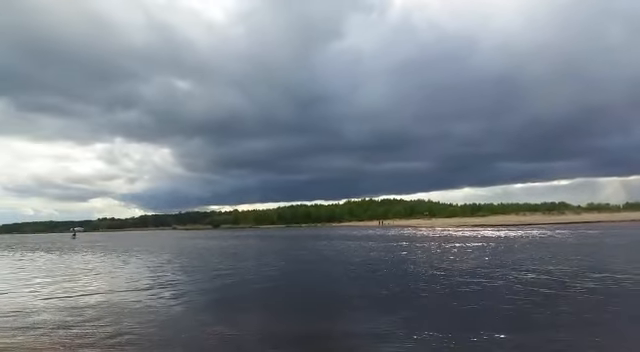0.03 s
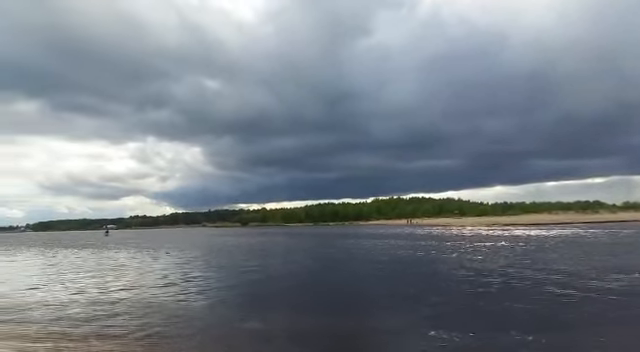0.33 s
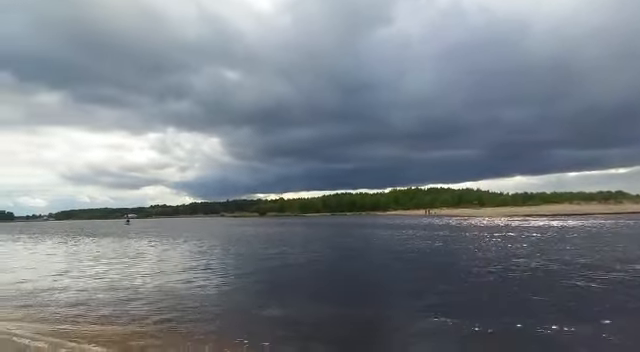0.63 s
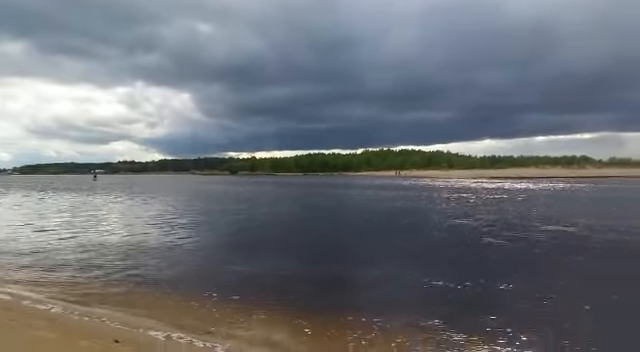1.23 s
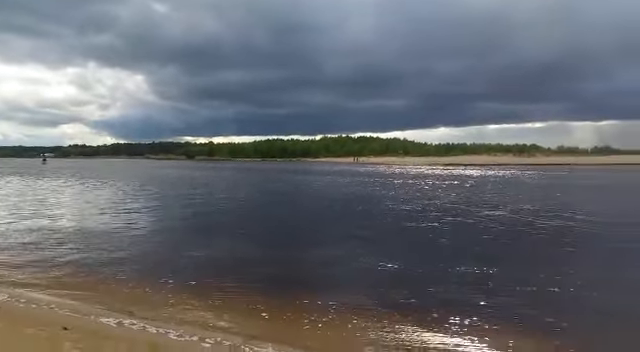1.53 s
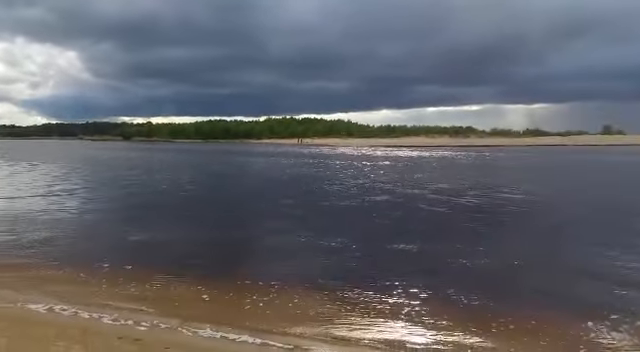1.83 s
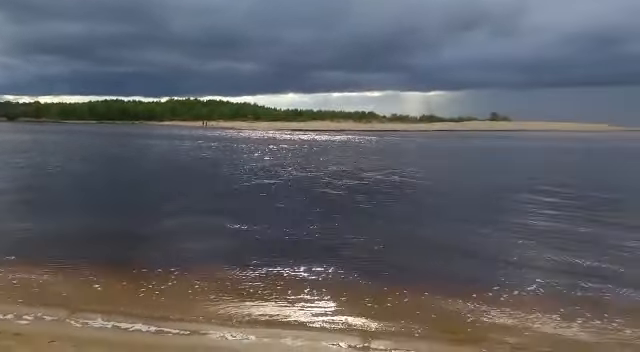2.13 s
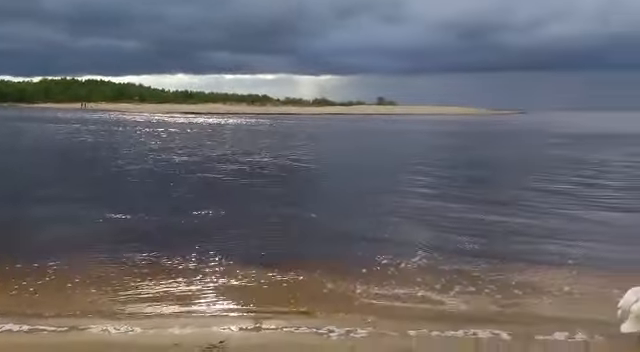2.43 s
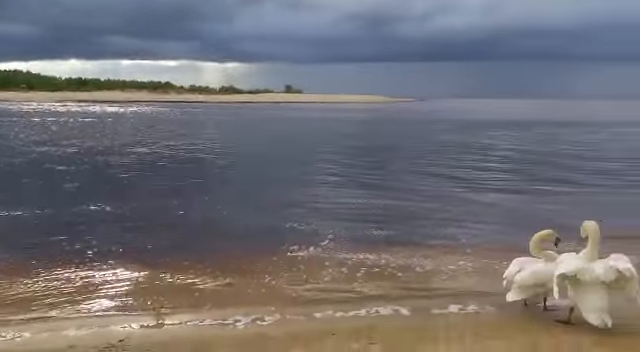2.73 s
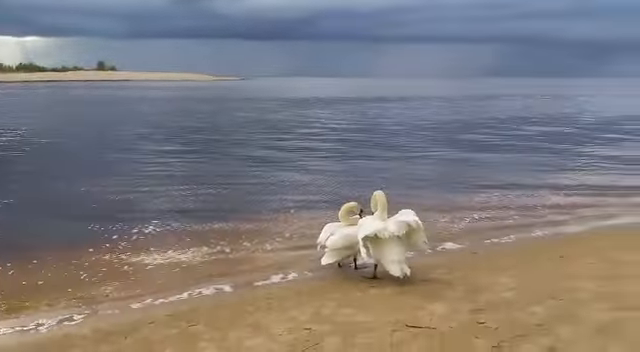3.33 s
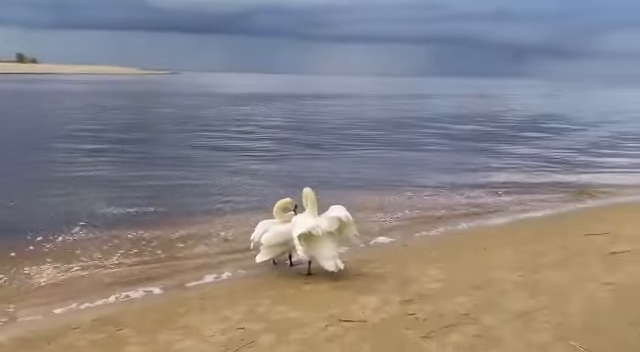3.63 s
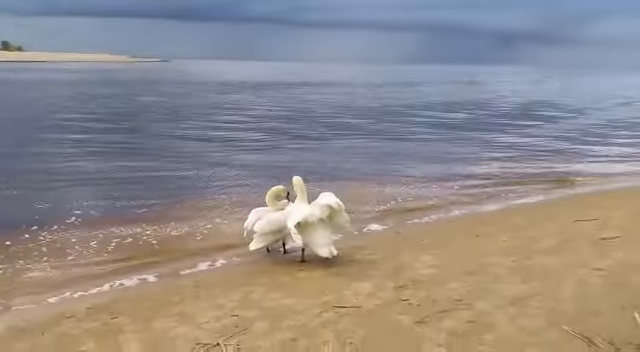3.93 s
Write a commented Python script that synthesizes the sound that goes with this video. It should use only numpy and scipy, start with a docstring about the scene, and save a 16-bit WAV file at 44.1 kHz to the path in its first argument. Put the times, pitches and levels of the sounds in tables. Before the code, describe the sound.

A swan gives a short snort and a long rattling grunt, with wind and lapping water.

```python
"""A swan on a sandy shore gives a short snort, then one long rattling grunt. Its voice is a
source and a filter: slow flaps release bursts of air that ring the resonances of its long throat.
Turbulent wind buffets the two microphone ports separately and drops after three seconds.
Small waves wash and fizz throughout, with ringing bubbles and, near the end, two clear drips."""
import sys
import numpy as np
from scipy import signal
from scipy.fft import rfft, irfft, next_fast_len
from scipy.io import wavfile
from scipy.ndimage import uniform_filter1d, minimum_filter1d, map_coordinates

SR = 44100
rng = np.random.default_rng(int(sys.argv[2]) if len(sys.argv) > 2 else 0)


def store_wav(level_fs):
    """Save 16-bit WAV to argv[1]."""
    pcm = np.round(np.clip(np.atleast_2d(level_fs), -1, 1) * 32767)
    wavfile.write(sys.argv[1], SR, pcm.T.astype(np.int16))


N = 176400

# Effort of each call. Each row: time in seconds, relative level in dB, treble gain in dB.
SNORT_EFFORT = [(.401, -40.5, -9), (.436, -31, -10.5), (0.493, -46.5, -11)]
GRUNT_EFFORT = [(2.06, -32.5, -17.5), (2.103, -29, -16.5), (2.219, -31.5, -15), (2.318, -23, -15),
                (2.5, -34, -11.5), (2.758, -34.5, -12.5), (2.95, -36, -10), (3.34, -38.5, -22.5),
                (3.39, -45, -10), (3.669, -45, -3.5)]
# Pace of each call. Each row: start in seconds, flaps per second. The last row ends the call.
SNORT_PACE = [(.401, 30), (.434, 52), (.51, 52)]
GRUNT_PACE = [(2.058, 22), (2.104, 26), (2.142, 41), (2.262, 50), (2.522, 43), (2.592, 53), (2.722, 45),
              (2.901, 40.5), (3.148, 36.5), (3.339, 29), (3.68, 29)]
# Shape of the throat. Each row: time in seconds, then six resonance frequencies in Hz.
THROAT_HZ = [(.44, 760, 1900, 2400, 4300, 4850, 5300), (2.25, 660, 2050, 2460, 4250, 4650, 5400),
             (2.7, 843, 1750, 2540, 4500, 4850, 6150), (3.0, 917, 1750, 2300, 4650, 4850, 6300),
             (3.25, 900, 1950, 2450, 4650, 4950, 5800), (3.6, 814, 1900, 2400, 4350, 4600, 4950)]
# The six resonances. Each row: bandwidth of each of two cascaded stages in Hz, gain in dB.
FORMANTS = [(323, 10), (389, 7), (231, 5), (413, 3.5), (332, 8), (356, 0.5)]
# Treble shelf of the voice. Each row: frequency in Hz, share of the treble gain from 0 to 1.
TREBLE_SHELF = [(2500, 0), (4500, 1)]
# The left port lags less as the microphone turns to the bird. Each row: time and lag in seconds.
LEFT_LAG = [(2.9, .00035), (3.3, .0001)]

# Airflow at each port. Each row: time in seconds, relative rumble level in dB.
FLOW_LEFT = [(0, -22), (.35, -35), (.4, -18.5), (.73, -32), (1.0, -25), (1.6, -25.5), (2.1, -13.5),
             (2.5, -25), (2.9, -24), (3.2, -42), (3.45, -33), (4, -36.5)]
FLOW_RIGHT = [(0, -40.5), (.66, -35.5), (.72, -27), (1.48, -19), (1.58, -28.5), (1.95, -22.5), (2.22, -29),
              (2.4, -15.5), (2.88, -15.5), (2.93, -32.5), (4, -37.5)]
# Single eddies. Each row: middle and length in seconds, relative rumble and flutter in dB, port hit.
EDDIES = [(.091, .018, -6.5, -19, "left"), (0.151, .065, -13, -28.5, "left"),
          (0.28, 0.021, -12, -33, "left"), (0.398, 0.018, -15.5, -26.5, "left"),
          (0.528, 0.025, -13, -32.5, "left"), (0.686, 0.017, -18.5, -36.5, "right"),
          (0.813, 0.03, -15, -25.5, "left"), (1.019, 0.017, -10.5, -23.5, "right"),
          (1.043, 0.015, -6.5, -35, "left"), (1.271, 0.011, -6, -37, "right"),
          (1.368, 0.0097, -12, -19, "right"), (1.488, 0.013, -10.5, -15, "right"),
          (1.539, 0.018, -16.5, -15.5, "left"), (1.66, 0.034, -10, -28.5, "left"),
          (1.749, 0.061, -11.5, -25.5, "left"), (1.838, 0.023, -10, -18.5, "right"),
          (1.866, 0.019, -12.5, -9.5, "right"), (1.997, 0.021, -16.5, -16, "left"),
          (2.076, 0.09, -16, -23, "right"), (2.152, 0.011, -11, -31, "left"),
          (2.288, 0.036, -12, -15.5, "right"), (2.371, 0.014, -8.5, -2.5, "right"),
          (2.419, 0.052, -37, -14, "right"), (2.474, 0.008, -24.5, -4.5, "right"),
          (2.581, 0.16, -18.5, -14.5, "right"), (2.775, 0.016, -23, -11.5, "right"),
          (2.832, 0.013, -32.5, -14.5, "right"), (2.872, 0.011, -13, -13.5, "right"),
          (3.357, 0.017, -28, -26.5, "left")]
# Spectra of the three wind noises. Each row: frequency in Hz, relative level in dB.
RUMBLE_SPECTRUM = [(20, -12), (45, -6.5), (70, 3.5), (170, 2), (320, -13), (480, -19.5), (2000, -100)]
FLUTTER_SPECTRUM = [(120, -12.5), (260, 4), (430, -2), (750, -13.5), (1300, -38), (5000, -95.5)]
CRACKLE_SPECTRUM = [(300, -10.5), (650, 12), (1200, 1), (1750, -11), (3000, -33.5), (8000, -70.5)]

# Lapping waves. Each row: time in seconds, wash in dB, fizz in dB, fizz left minus right in dB.
WAVES = [(.1, -57.5, -59.5, -7), (.2, -51.5, -50, -4.5), (.7, -54.5, -57, -2), (1.72, -53, -51, -2),
         (2.8, -50.5, -56, -7.5), (3.35, -59.5, -63.5, -3.5), (3.45, -51.5, -63, -15.5),
         (3.8, -51, -56, -4), (3.98, -43.5, -48, -4.5)]
# Spectra of the two water noises. Each row: frequency in Hz, relative level in dB.
WASH_SPECTRUM = [(150, -6.5), (800, -2.5), (1300, -12), (2000, -7.5), (2500, -12.5), (3100, -21),
                 (4000, -18), (7000, -55.5)]
FIZZ_SPECTRUM = [(2500, -23.5), (3600, -22.5), (4700, 3), (6200, -5.5), (7000, -11), (15000, -3.5)]
# Clear drips. Each row: start in seconds, pitch in Hz, level in dB, left minus right in dB.
DRIPS = [(3.427, 4560, -41.5, -16), (3.518, 4500, -41, -15)]
# Frequency response of the microphone. Each row: frequency in Hz, gain in dB.
MIC_RESPONSE = [(6200, 1.5), (7300, -12.5), (8200, -26.5), (11000, -26.5), (12500, -19.5), (15800, -25)]


def swan_call(pace, effort, leak_db):
    """Source and filter: each flap sends a noise burst, then a weak leak, through the throat."""
    attack_s, decay_s, leak_decay_s, jitter_s = .0012, .0034, .015, .0012
    boost_db, scatter_db, diffuse_db, treble_lean_db = 4, 1.8, -12, -10
    out, size = np.zeros((2, N)), 4096
    t, hz = np.arange(size) / SR, np.fft.rfftfreq(size, 1 / SR)
    starts = np.concatenate([np.linspace(start, end, round((end - start) * rate), endpoint=False)
                             for (start, rate), (end, _) in zip(pace, pace[1:])])
    usual_db = np.mean(effort, axis=0)[1]
    shelf = along(TREBLE_SHELF, hz)
    for start in starts:
        air = rng.standard_normal((2, size))
        stray_db, stray_s = rng.normal(0, [scatter_db, jitter_s])
        level_db, treble_db = curves(effort, start)
        # More air leaks between flaps as the bird pushes harder.
        leak = amp(leak_db + .35 * (level_db - usual_db)) * np.exp(-t / leak_decay_s)
        burst = (1 - np.exp(-t / attack_s)) ** 2 * (np.exp(-t / decay_s) + leak)
        direct, diffuse = rfft(air * burst) * throat(start, hz) * amp(treble_db * shelf)
        diffuse *= amp(diffuse_db)
        # The right port hears the flap first and brighter.
        lag = np.exp(-2j * np.pi * hz * curves(LEFT_LAG, start)[0])
        flap = irfft(panned(treble_lean_db * shelf) * [(direct + diffuse) * lag, direct - diffuse])
        flap *= np.sqrt(2 * SR * decay_s / np.sum(flap ** 2))  # equal energy before the gain
        add(out, start + stray_s, amp(boost_db + level_db + stray_db) * flap)
    return out


def throat(time_s, hz, scatter=.014):
    """Resonance of an air column: six parallel formants, slightly detuned at every flap."""
    centres = np.array(curves(THROAT_HZ, time_s)) * rng.normal(1, scatter, len(FORMANTS))
    return sum(amp(db) * (1j * hz * width / (centre ** 2 - hz ** 2 + 1j * hz * width)) ** 2
               for centre, (width, db) in zip(centres, FORMANTS))


def wind():
    """Turbulent pressure: each port rumbles, eddies add flutter, and the strongest flow crackles."""
    t = np.arange(N) / SR
    flow_db = np.array(curves(FLOW_LEFT, t) + curves(FLOW_RIGHT, t)) + 4 * wobble(per_s=27.723)
    rumble, flutter = amp(flow_db), amp(1.6 * flow_db - 2)  # flutter grows faster than rumble
    for middle, length, rumble_db, flutter_db, side in EDDIES:
        port = int(side == "right")
        swell = 1 / np.hypot(1, (2 * (t - middle) / length) ** 4)
        rumble[port] = np.maximum(rumble[port], amp(rumble_db) * swell)
        flutter[port] = np.maximum(flutter[port], amp(flutter_db) * swell)
    rumble *= amp(-.5)
    flutter *= amp(3.5 * wobble(per_s=110) - 1)
    return crackle(flutter) + rumble * churn(RUMBLE_SPECTRUM) + flutter * churn(FLUTTER_SPECTRUM)


def crackle(flutter, knee_db=-12.5, level_at_knee_db=-24.5, swing_db=13.5):
    """Intermittency: strong wind tears into spurts that grow about as the flutter squared, to a cap."""
    strength = amp(level_at_knee_db) * np.minimum(flutter / amp(knee_db), 2) ** 1.95
    spurts = rng.standard_normal((2, N)) * amp(swing_db * np.minimum(wobble(per_s=400), 1))
    return strength * coloured(spurts, CRACKLE_SPECTRUM)


def churn(spectrum, evenness=.55):
    """Local turbulence: noise of fairly even strength, uncorrelated between the two ports."""
    noise = coloured(rng.standard_normal((2, N)), spectrum)
    even = noise / np.abs(signal.hilbert(noise)) ** evenness
    # Flattening the envelope spreads the spectrum, so its skirts are trimmed.
    return unit(filtered(even, lambda hz: np.minimum(amp(along(spectrum, hz) + 14.5), 1)))


def water():
    """Broadband noise and bubble resonance: waves wash, fizz and foam on the sand, and drips ring."""
    wash_db, fizz_db, lean_db = curves(WAVES, np.arange(N) / SR)
    out = amp(wash_db) * rush(WASH_SPECTRUM) + amp(fizz_db) * panned(lean_db) * rush(FIZZ_SPECTRUM)
    for start, hz, db, side_db in DRIPS:
        add(out, start, amp(db) * panned(side_db) * bubble(hz, decay_cycles=17.7))
    return out + amp(wash_db - 15) * foam()


def rush(spectrum, patch_db=3.5):
    """Random modulation: water noise swells and fades in patches of time and frequency."""
    cells = signal.stft(rng.standard_normal((2, N)), nperseg=256)[2]
    patches = uniform_filter1d(rng.standard_normal(cells.shape), size=4, axis=1)
    patches = uniform_filter1d(patches, size=9, axis=2)
    mid, side = signal.istft(cells * amp(patch_db * unit(patches)), nperseg=256)[1][:, :N]
    return coloured(np.array([mid + side, mid - side]), spectrum)


def foam(bubbles_per_s=50, median_hz=2030, highest_hz=6000):
    """Superposition: bubbles of random pitch, level and side ring at random times."""
    out = np.zeros((2, N))
    for start in rng.uniform(0, N / SR, int(bubbles_per_s * N / SR)):
        hz = min(median_hz * rng.lognormal(sigma=.5), highest_hz)
        db, side_db = rng.normal(0, [3.3, 5])
        add(out, start, amp(db) * panned(side_db) * bubble(hz, decay_cycles=5.5))
    return unit(out)


def bubble(hz, decay_cycles):
    """A damped oscillator: a bubble rings down while its pitch rises a little."""
    age = np.arange(SR // 25) / SR * hz / decay_cycles  # in decay times
    ring = np.sin(2 * np.pi * decay_cycles * age * (1 + .01 * age))
    return ring * np.exp(-age) * (1 - np.exp(-6 * age))


def amp(db):
    """Amplitude ratio of a level in dB."""
    return 10 ** (np.asarray(db) / 20)


def unit(x):
    """Normalisation to an rms of 1."""
    return x / np.sqrt(np.mean(x ** 2) + 1e-20)


def along(points, hz):
    """Interpolation on a logarithmic frequency axis."""
    knots_hz, values = np.transpose(points)
    return np.interp(np.log(hz + 1), np.log(knots_hz + 1), values)


def curves(rows, at):
    """Linear interpolation in time of each column after the first."""
    times, *columns = np.transpose(rows)
    return [np.interp(at, times, column) for column in columns]


def wobble(per_s):
    """Spline interpolation of random knots: one smooth curve for each channel."""
    at = np.arange(N) * per_s / SR
    return np.array([map_coordinates(knots, [at]) for knots in rng.standard_normal((2, 4096))])


def filtered(x, response):
    """Filtering as multiplication in the frequency domain."""
    size = next_fast_len(N + SR // 4)
    return irfft(rfft(x, size) * response(np.fft.rfftfreq(size, 1 / SR)), size)[..., :N]


def coloured(x, spectrum):
    """Spectral shaping, at an rms of 1."""
    return unit(filtered(x, lambda hz: amp(along(spectrum, hz))))


def panned(db):
    """Amplitude panning: two gains for a level difference, left minus right."""
    return amp(np.array([db, -db]) / 2).reshape(2, -1)


def add(out, start_s, sound):
    """Superposition of a sound from a given time on."""
    i = int(np.clip(round(start_s * SR), 0, N - 1))
    out[:, i:i + sound.shape[-1]] += sound[..., :N - i]


def scene():
    """Superposition: the pressures of swan, wind and water add at each port."""
    snort = swan_call(SNORT_PACE, SNORT_EFFORT, leak_db=-5)
    grunt = swan_call(GRUNT_PACE, GRUNT_EFFORT, leak_db=-18.5)
    return snort + grunt + wind() + water()


def record(dry):
    """Peak limiting holds the hardest buffets; the microphone's response dulls the upper treble."""
    ceiling, window_s, cutoff_hz = .75, .008, 15800
    size = int(window_s * SR)
    needed_gain = ceiling / np.maximum(np.abs(dry), ceiling)
    gain = uniform_filter1d(minimum_filter1d(needed_gain, size), size)
    return filtered(dry * gain, lambda hz: amp(along(MIC_RESPONSE, hz)) * (hz < cutoff_hz))


dry = scene()
out = record(dry)
store_wav(out)
```